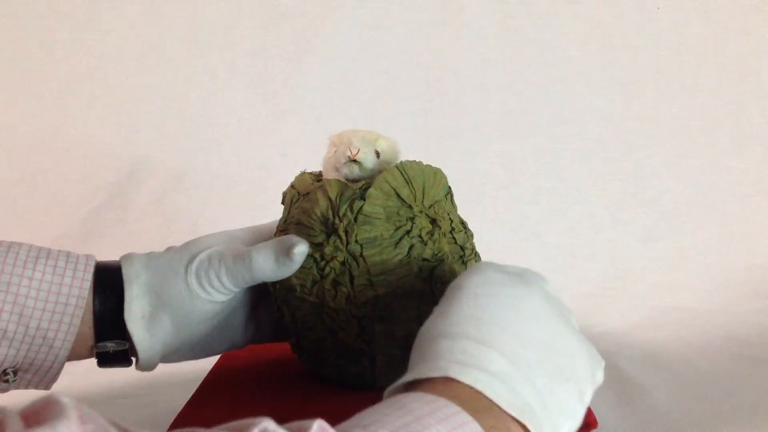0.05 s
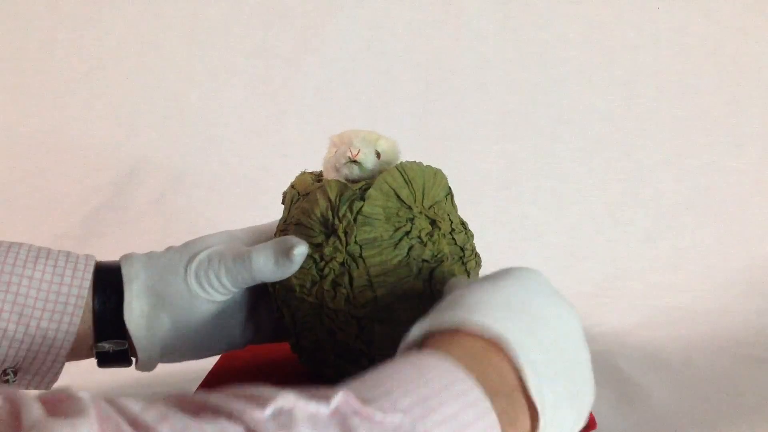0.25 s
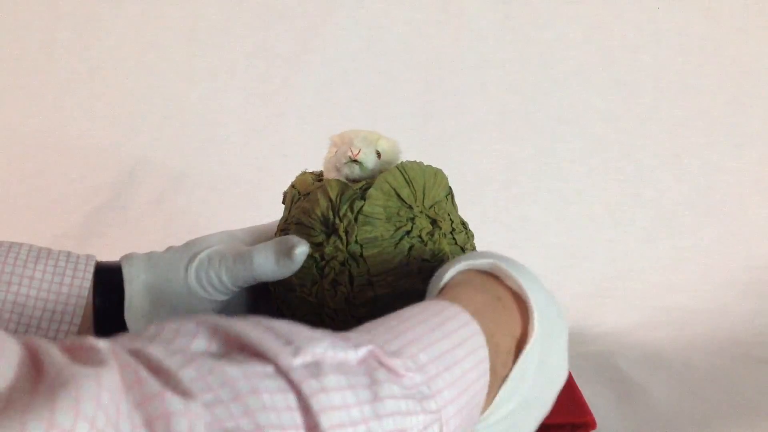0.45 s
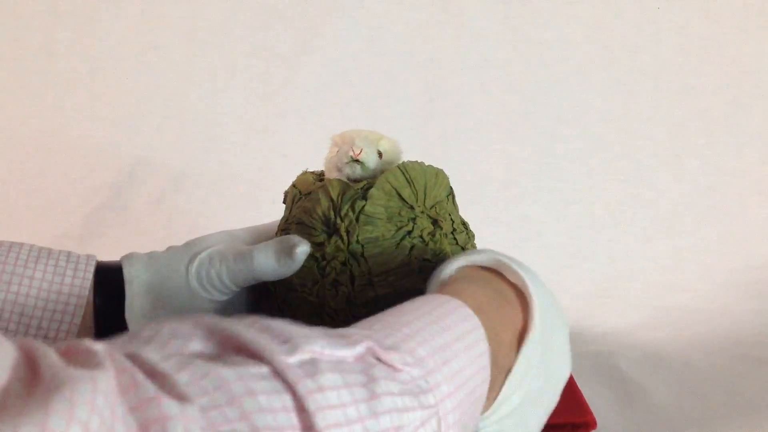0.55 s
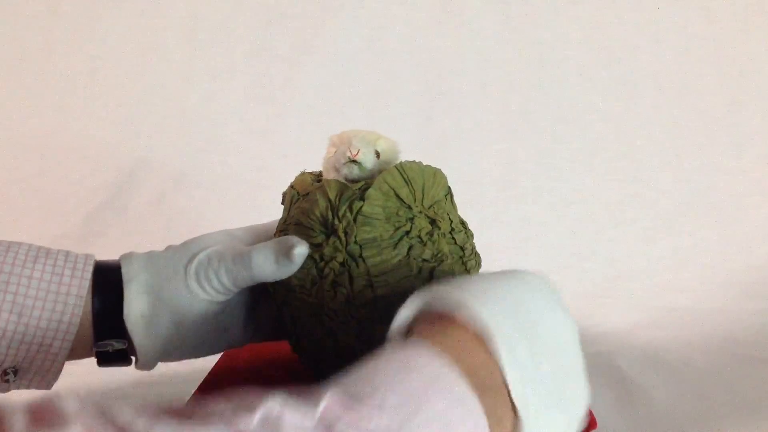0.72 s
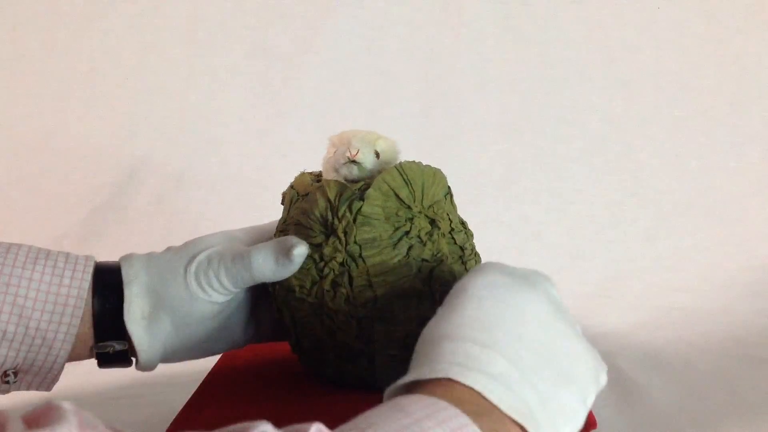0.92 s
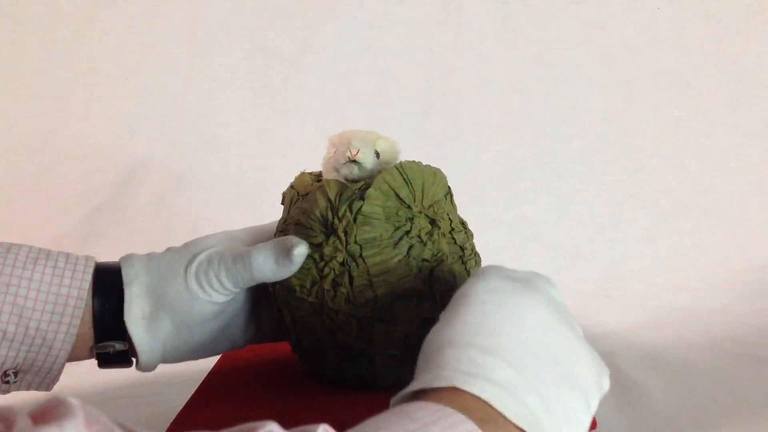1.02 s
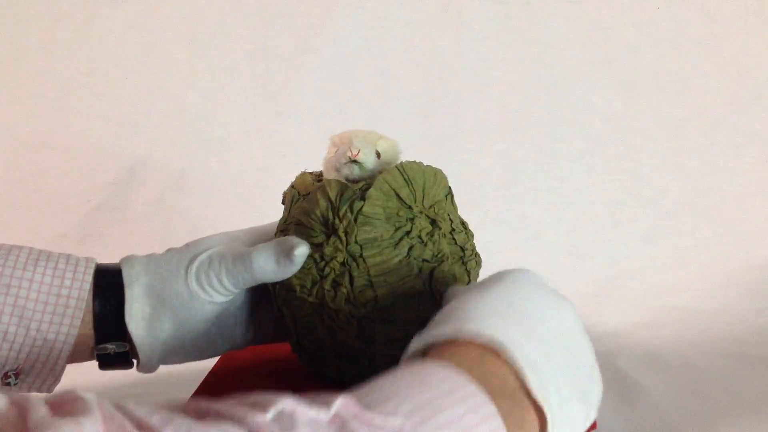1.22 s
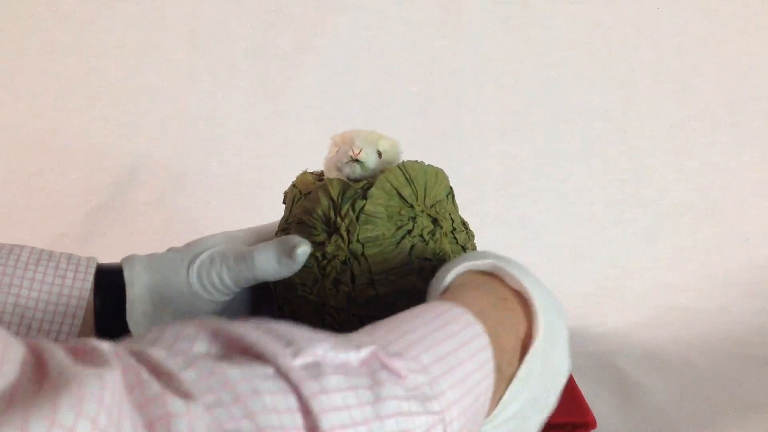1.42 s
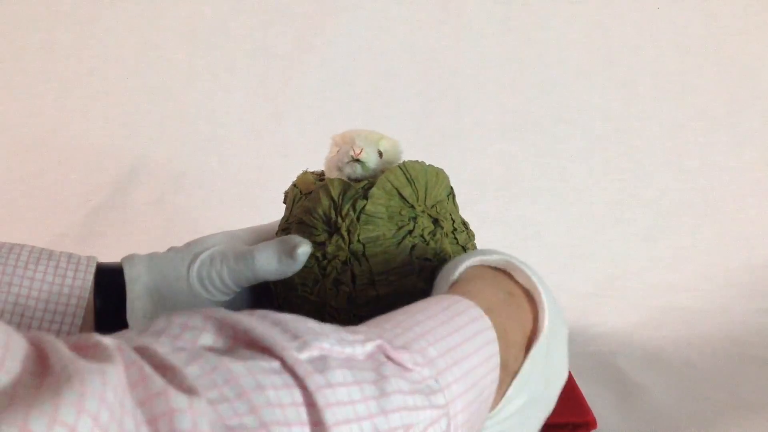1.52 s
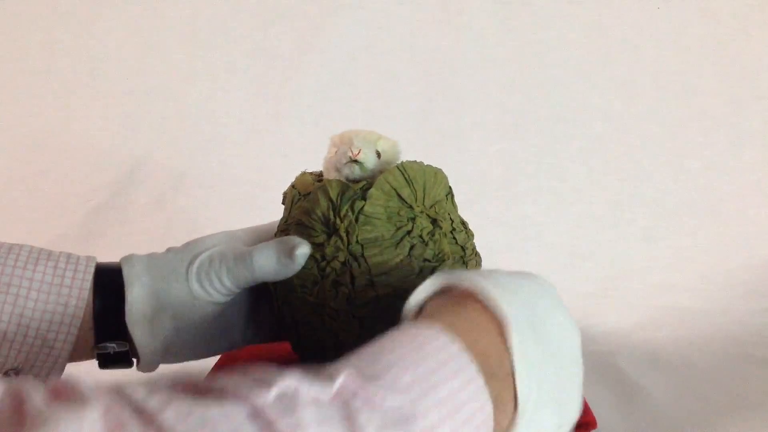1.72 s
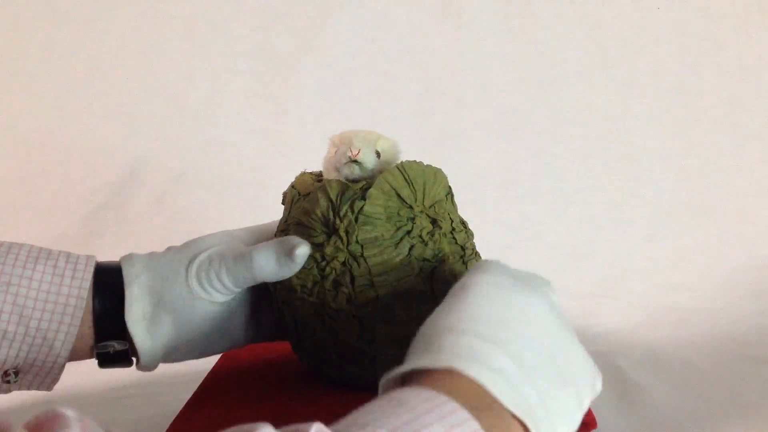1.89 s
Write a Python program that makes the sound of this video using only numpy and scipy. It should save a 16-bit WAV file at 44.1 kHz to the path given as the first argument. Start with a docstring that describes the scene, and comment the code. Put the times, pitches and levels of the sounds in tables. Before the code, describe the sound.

Winding a clockwork key, two fast runs of bright ratcheting clicks with low clunks, in a bare room

```python
"""A gloved hand winds a clockwork toy on a table, two turns of the key, in a bare room.
Room hiss, a fading earlier ring and soft bumps of the table top (noise bands, damped modes) come first.
In each turn the key takes up its slack with a rattle in the case, the pawl snaps over ten teeth and
taps the metal frame, and the gear train clunks back when the hand lets go. Soft bumps recur around the
second turn. Wall echoes and a diffuse noise tail answer every blow."""
import sys
import numpy as np
from scipy import signal
from scipy.io import wavfile
from scipy.ndimage import uniform_filter1d

SR = 44100
rng = np.random.default_rng(int(sys.argv[2]) if len(sys.argv) > 2 else 0)


def unload_audio(sound):
    """Save the sound as a 16-bit wav file, at the path given as the first command line argument."""
    columns = np.transpose(np.atleast_2d(sound))
    # keep every value between -1 and 1, then stretch to whole-number steps
    steps = np.round(np.clip(columns, -1, 1) * 32767)
    wavfile.write(sys.argv[1], SR, steps.astype(np.int16))


N = 85995  # length in samples

# Spectral shape of the room hiss. Each row: frequency in Hz, relative density in dB per Hz.
HISS_SPECTRUM = [(59, -40), (100, -5), (293, -2), (438, -6.5), (742, -4), (917, -4), (1040, -9.5),
                 (5400, -14.5), (15500, -18)]
HISS_RMS_DB, FLICKER_DB = -64, -0.84  # level before the microphone; depth per unit of smoothed noise
# The room still rings from an earlier turn: level at the start, decay time, reference pitch.
FADING_START_DB, FADING_T60_S, FADING_HZ = -71.5, 0.99, 796

# Soft low bumps through the table. Each row: start in seconds, peak before room and microphone in dB.
BUMP_EVENTS = [(0.045, -60), (0.107, -63), (0.82, -61), (0.892, -59), (1.074, -51.5), (1.2, -51),
               (1.602, -36.5), (1.634, -45), (1.718, -42), (1.839, -42.5)]
BUMP_PUSH_S = 0.0049
# Resonances of the table top. Each row: frequency in Hz, width in Hz, relative level in dB.
TABLE_MODES = [(158.4, 34.4, -10), (270.5, 80, 2), (356, 240, 4.5)]

# Key taking up slack and gear train falling back. Each row: start in seconds, peak before room and
# microphone in dB, share into the frame in dB, rattle length in seconds, favoured case pitch in Hz.
CLUNK_EVENTS = [(0.2295, -32, -4, 0.0064, 745), (.640, -26, -6, 0.0051, 1130),
                (1.2193, -34, -4.5, .006, 755), (1.664, -25, -7, 0.0064, 1005)]
RATTLE_TAPS = 7
FAVOUR_DB_PER_OCTAVE = 2.5  # loss of a case mode per octave away from the favoured pitch
# Resonances of the case. Each row: frequency in Hz, width in Hz, relative level in dB.
CASE_MODES = [(267.6, 132, -8), (416, 138, -5), (534.3, 70, -7.5), (779, 101, -1.5), (888, 140, 0),
              (1099, 142, -2.5), (1268, 93, -6), (1368, 145, -5.5), (2100, 100, -6.5), (2562, 200, -8)]

# Pawl dropping off each tooth. Each row: start in seconds, peak before room and microphone in dB,
# share into the case in dB, lift of the frame modes above 8 kHz in dB.
TOOTH_EVENTS = [(0.2544, -18.5, -16.5, 3.5), (0.2804, -18.5, -15.5, 9), (0.3061, -21, -15.5, 8.5),
                (0.3335, -19.5, -15.5, 1), (0.3644, -19, -13.5, 2), (0.3947, -19.5, -21, 2.5),
                (0.4214, -21, -14.5, -0.5), (0.4455, -20.5, -17, -3), (0.4725, -20, -17, -3),
                (0.5165, -20, -11, -0.5), (1.2321, -19.5, -14, 3.5), (1.264, -21, -13, 3.5),
                (1.295, -21.5, -14, 3), (1.326, -20.5, -12, 4), (1.362, -20, -11.5, 4.5),
                (1.389, -21, -12.5, 4), (1.4104, -22, -12.5, 5), (1.4319, -19.5, -10.5, 3),
                (1.4574, -20.5, -15.5, 3), (1.4936, -20.5, -12.5, 1)]
# The pawl grazes the tooth, lands and bounces. Each row: mean delay in seconds, mean level in dB.
CHATTER_TAPS = [(0, -10), (.0005, 3.5), (.0012, -5.5), (.0023, -5.5)]
CHATTER_JITTER_S, CHATTER_SPREAD_DB = .00003, 2.5
# Resonances of the metal frame. Each row: mean frequency in Hz, width in Hz, mean relative level in dB.
FRAME_MODES = [(2246, 205, -7), (2880, 272, -5), (3414, 270, 0.5), (3818, 338, 0.5), (5050, 360, -8),
               (6050, 205, -14), (6985, 340, -11.5), (8760, 770, -11.5), (10280, 1250, -11),
               (12000, 360, -16), (12340, 570, -22), (13000, 470, -18), (15100, 1100, -19)]
# Each blow lands a little differently: level spread from 6 kHz up (less below), fractional pitch spread.
MODE_SPREAD_DB, MODE_DRIFT = 3.0, 0.012

# Wall echoes. Each row: delay in seconds, level in dB before the echo high-pass.
WALL_ECHOES = [(.0141, -10), (0.031, -13.5), (0.058, -38)]
ECHO_LOW_HZ = 1400  # the walls return the treble more cleanly
# Decay of the diffuse tail. Each row: frequency in Hz, time to fall 60 dB in seconds.
TAIL_T60 = [(150, 0.32), (500, 0.48), (2000, 0.49), (5500, 0.57), (14600, 0.38)]
# Strength of the diffuse tail. Each row: frequency in Hz, reverberant energy in dB.
TAIL_ENERGY = [(150, -2), (300, 1.5), (420, -1.5), (550, 0.5), (750, -6.5), (1100, -8), (1600, 1.5),
               (2500, -7.5), (5500, -6.5), (14600, -7.5)]
TAIL_BUILD_S = 0.0032

MIC_LOW_HZ, TOP_HZ = 131.5, 15700
RUMBLE_RMS_DB = -89  # before the cut of the top


def undb(db):
    """Amplitude ratio: twenty decibels make a factor of ten."""
    return 10 ** (np.asarray(db) / 20)


def read(table, hz):
    """Interpolation of a (Hz, value) table on a logarithmic frequency axis."""
    points = np.array(table)
    return np.interp(np.log(hz), np.log(points[:, 0]), points[:, 1])


def band(x, lo_hz, hi_hz):
    """Band-pass filtering: only the frequencies between two limits are kept."""
    limits = [lo_hz, min(hi_hz, SR / 2.1)]
    return signal.sosfilt(signal.butter(2, limits, "band", fs=SR, output="sos"), x)


def ring(modes, tilt_db=0, chance=None):
    """Modal superposition: a tap excites damped sines, neighbours in opposite phase, for 60 ms."""
    hz, width_hz, level_db = np.array(modes).T[:, :, None]
    level_db = level_db + np.reshape(tilt_db, (-1, 1))
    if chance is not None:
        level_db = level_db + MODE_SPREAD_DB * chance[1] * np.minimum(hz / 6000, 1)
        hz = hz * (1 + MODE_DRIFT * chance[0])
    t = np.arange(SR * 6 // 100) / SR
    sign = (-1.) ** np.arange(len(hz))[:, None]
    decay = np.exp(-np.pi * width_hz * t)  # a wider resonance dies sooner
    return np.sum(sign * undb(level_db) * decay * np.sin(2 * np.pi * hz * t), axis=0)


def ring_frame(tilt_db=0):
    """Modal superposition for the metal frame, with the modes varied at random for each blow."""
    return ring(FRAME_MODES, tilt_db, rng.standard_normal((2, len(FRAME_MODES), 1)))


def add(out, at_s, peak_db, delays, sizes, body):
    """Convolution: a group of taps rings the body, scaled so that its highest swing is peak_db."""
    lag = ((delays - delays.min()) * SR).astype(int)
    hit = np.convolve(np.bincount(lag, sizes), body)
    start = int(at_s * SR)
    hit = hit[:N - start]
    out[start:start + len(hit)] += hit * undb(peak_db) / np.abs(hit).max()


def hiss():
    """Filtered noise: half-octave bands flicker independently over the decaying earlier ring."""
    out = 0
    step = SR // 12  # samples between new flicker values
    for hz in 40 * 2 ** np.arange(0, 9, .5):
        steps = np.repeat(rng.standard_normal(N // step + 1), step)
        flicker = uniform_filter1d(steps, step)[:N]
        level_db = read(HISS_SPECTRUM, min(hz, 15000)) + FLICKER_DB * flicker
        noise = band(rng.standard_normal(N), hz / 2 ** .25, hz * 2 ** .25)
        out = out + undb(level_db) * noise
    fading = band(rng.standard_normal(N), FADING_HZ / 3.6, FADING_HZ * 1.23)
    fading_db = FADING_START_DB - 60 * np.arange(N) / SR / FADING_T60_S
    fading = fading / fading.std() * undb(fading_db)
    return out / out.std() * undb(HISS_RMS_DB) + fading


def bumps():
    """Smooth excitation: a push of a few milliseconds drives the low modes of the table top."""
    out = np.zeros(N)
    push = np.arange(int(BUMP_PUSH_S * SR) + 3)
    for at_s, peak_db in BUMP_EVENTS:
        add(out, at_s, peak_db, (push + .5) / SR, np.hanning(len(push)), ring(TABLE_MODES))
    return out


def clunks():
    """Repeated impact: a firm knock and fading rattle ring the case, with a share in the frame."""
    out = np.zeros(N)
    case_hz = np.array(CASE_MODES)[:, 0]
    for at_s, peak_db, frame_db, length_s, favour_hz in CLUNK_EVENTS:
        place, softness = rng.random((2, RATTLE_TAPS))
        progress = (np.arange(RATTLE_TAPS) + place) / RATTLE_TAPS  # one tap in each equal slot
        tap_db = -9 * progress - 6.4 * softness
        tilt_db = -FAVOUR_DB_PER_OCTAVE * np.abs(np.log2(case_hz / favour_hz))
        body = ring(CASE_MODES, tilt_db) + undb(frame_db) * ring_frame()
        add(out, at_s, peak_db, length_s * progress, undb(tap_db), body)
    return out


def ratchet():
    """Impulsive excitation: each tooth gives hard, close taps to the frame, with a share in the case."""
    out = np.zeros(N)
    delay_s, level_db = np.array(CHATTER_TAPS).T
    high = np.array(FRAME_MODES)[:, 0] > 8000
    for at_s, peak_db, case_db, bright_db in TOOTH_EVENTS:
        jitter, spread = rng.standard_normal((2, len(delay_s)))
        body = ring_frame(bright_db * high) + undb(case_db) * ring(CASE_MODES)
        tap_s = delay_s + CHATTER_JITTER_S * jitter
        tap_db = level_db + CHATTER_SPREAD_DB * spread
        add(out, at_s, peak_db, tap_s, undb(tap_db), body)
    return out


def diffuse_tail(t):
    """Statistical reverberation: third-octave noise builds up and decays exponentially band by band."""
    tail = 0
    for hz in 88 * 2 ** np.arange(0, 8, 1 / 3):
        noise = band(rng.standard_normal(len(t)), hz / 2 ** (1 / 6), hz * 2 ** (1 / 6))
        fade = undb(-60 * t / read(TAIL_T60, hz)) * (1 - np.exp(-t / TAIL_BUILD_S))
        fade_norm = np.sqrt(np.sum(fade ** 2))
        tail = tail + undb(read(TAIL_ENERGY, hz)) * noise * fade / fade_norm
    return tail


def wall_echoes(length):
    """Specular reflection: delayed impulses return with their bass weakened."""
    delay_s, level_db = np.array(WALL_ECHOES).T
    echoes = np.bincount((delay_s * SR).astype(int), undb(level_db), length)
    return signal.lfilter(*signal.butter(1, ECHO_LOW_HZ, "high", fs=SR), echoes)


def room(x):
    """Linear superposition: the direct sound is joined by its convolution with the room response."""
    t = np.arange(N // 2) / SR
    response = diffuse_tail(t) + wall_echoes(len(t))
    return x + signal.fftconvolve(x, response)[:N]


def scene():
    """Superposition: the blows sound in the room and the hiss is added; one channel."""
    blows = ratchet() + clunks() + bumps()
    return (room(blows) + hiss())[None]


def record(dry):
    """Band limitation: a small microphone loses the bass, faint rumble is added, the top is cut."""
    x = signal.sosfilt(signal.butter(4, MIC_LOW_HZ, "high", fs=SR, output="sos"), dry)
    rumble = band(rng.standard_normal(N), 17, 106)
    x = x + rumble / rumble.std() * undb(RUMBLE_RMS_DB)
    return signal.sosfilt(signal.ellip(8, .2, 70, TOP_HZ, fs=SR, output="sos"), x)


dry = scene()
out = record(dry)
unload_audio(out)
```